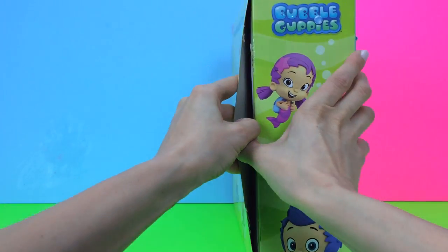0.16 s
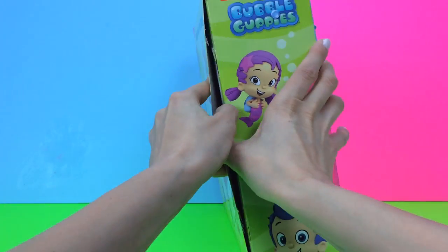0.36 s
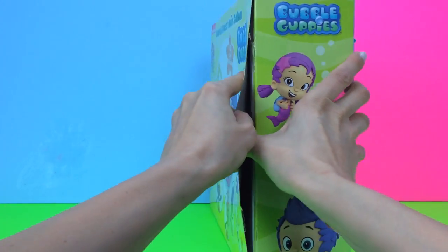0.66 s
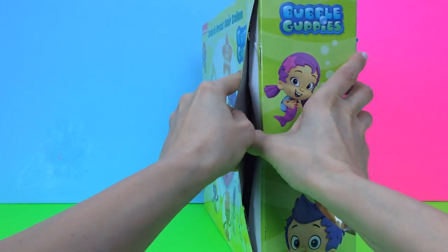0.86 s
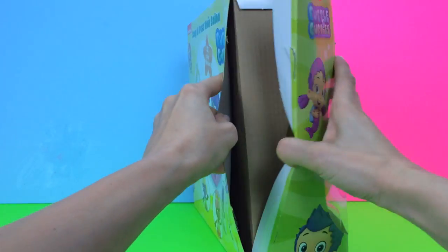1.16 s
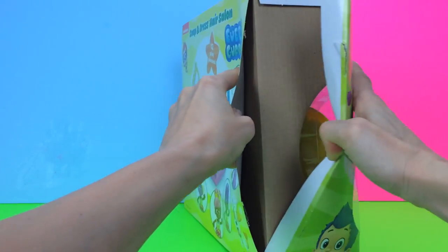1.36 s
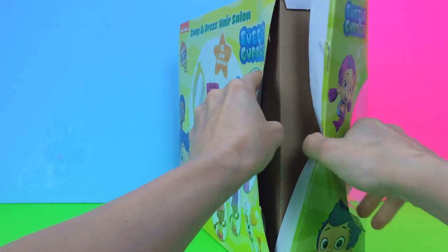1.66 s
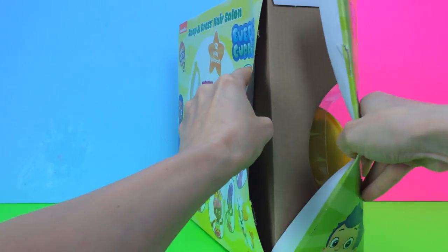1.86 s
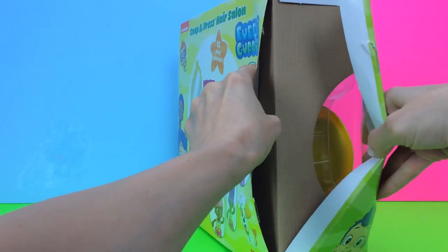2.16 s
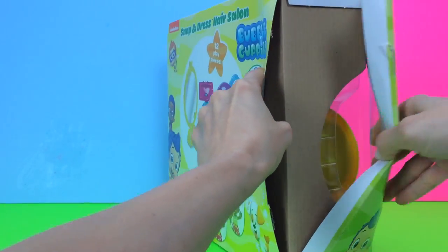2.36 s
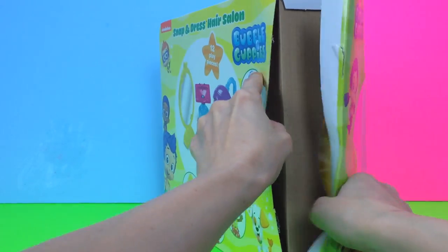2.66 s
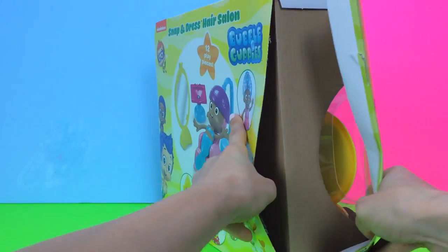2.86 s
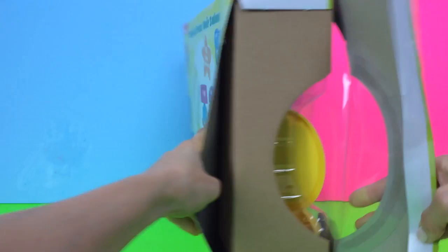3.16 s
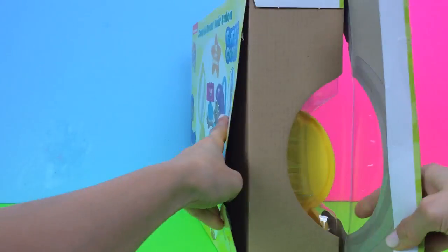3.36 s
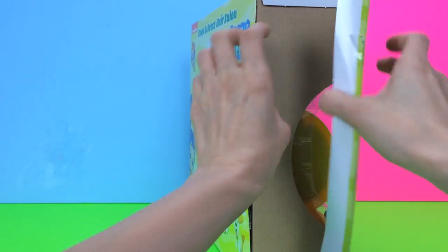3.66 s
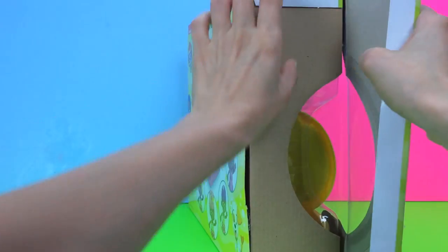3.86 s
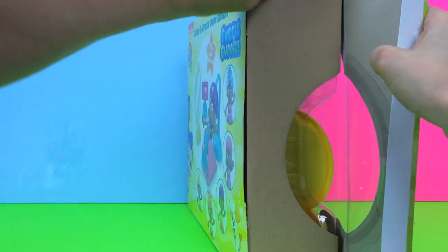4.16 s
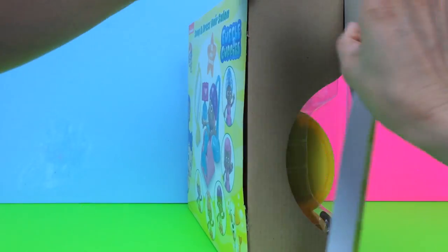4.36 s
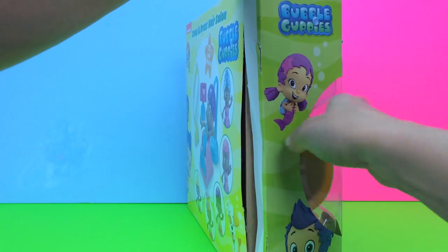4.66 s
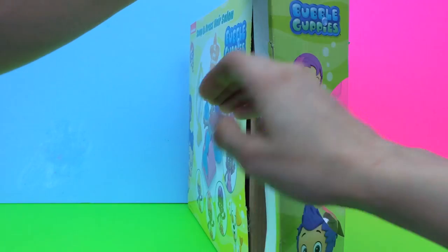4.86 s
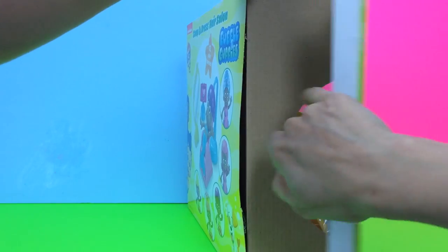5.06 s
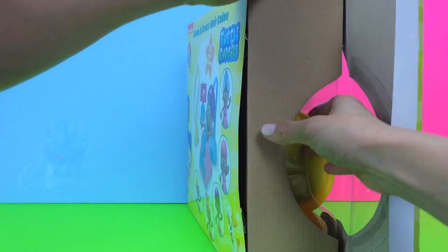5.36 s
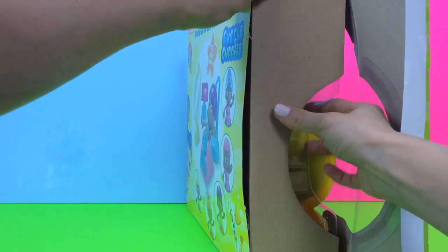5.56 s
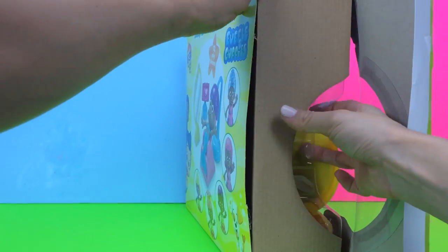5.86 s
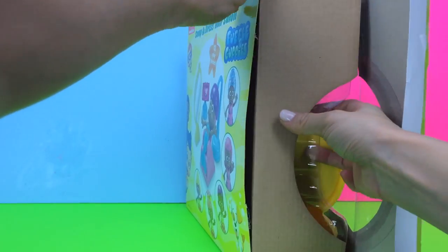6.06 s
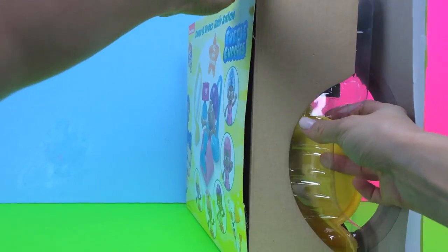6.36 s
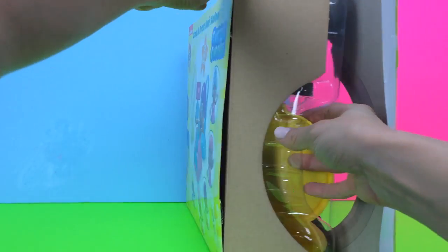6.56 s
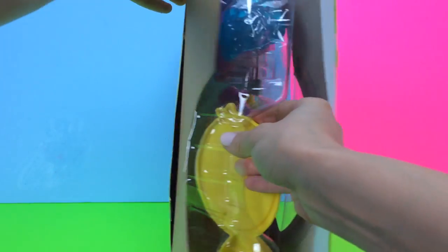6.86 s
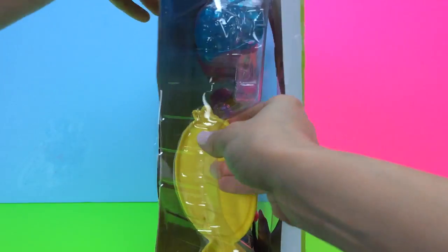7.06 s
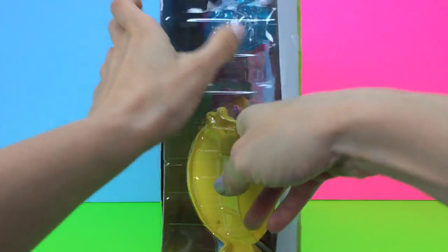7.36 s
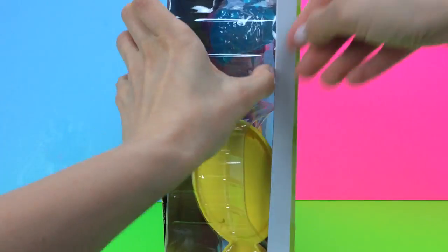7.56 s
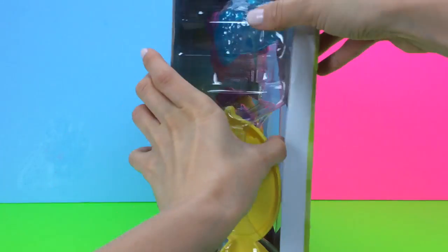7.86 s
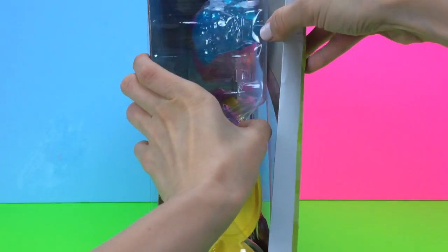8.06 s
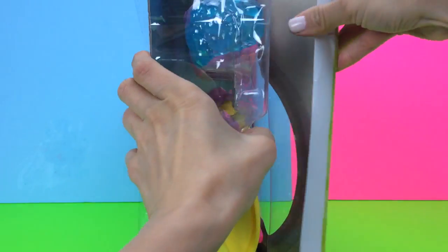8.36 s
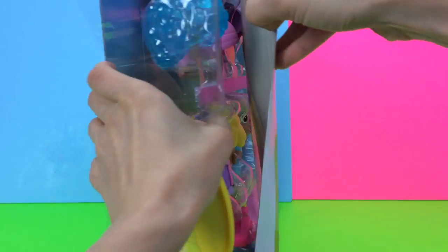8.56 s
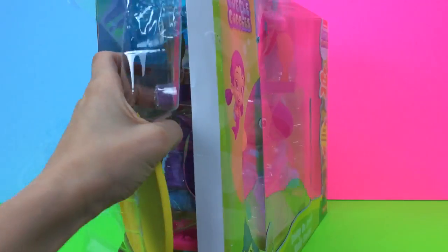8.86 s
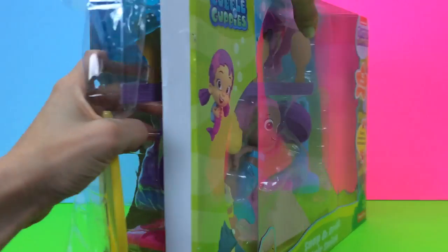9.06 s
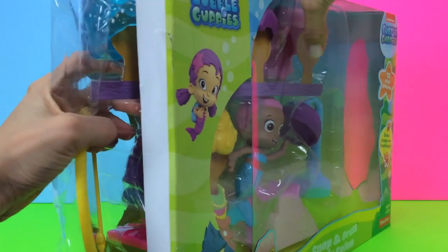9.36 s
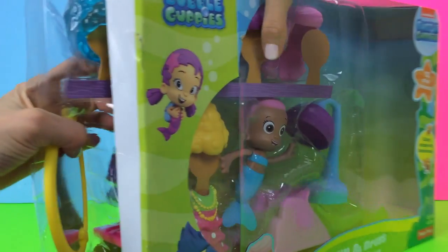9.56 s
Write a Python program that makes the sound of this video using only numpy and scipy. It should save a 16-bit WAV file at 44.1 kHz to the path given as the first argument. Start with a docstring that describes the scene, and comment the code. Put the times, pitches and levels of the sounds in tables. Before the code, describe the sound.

Hands shift and tap a hollow cardboard box, then work a crinkly thin plastic tray out with scrapes, clicks, rustles and a final quick chatter.

```python
"""Hands open a cardboard toy box and work a thin plastic tray out of it, in a small live room; mono.
From the start, over faint room noise, they shift and tap the card: jerky friction and single jerks make it ring.
Creases ping as falling notes, parts drag as rough friction, edges squeak and smooth faces hiss as gliding noise bands.
After six seconds the bared plastic adds resonances; near the end quick knocks chatter. Echoes follow every touch.
Panels boom, the stiff sheet rattles and the surface crackles: most touches sound in all three registers."""
import sys
import numpy as np
from scipy import signal
from scipy.fft import rfft, irfft
from scipy.io import wavfile

SR = 44100
rng = np.random.default_rng(int(sys.argv[2]) if len(sys.argv) > 2 else 0)


def generate_wav(sig):
    """Save sig (samples, or channels by samples) to the path in sys.argv[1] as 16-bit PCM at SR."""
    pcm = np.round(np.clip(np.atleast_2d(sig).T, -1, 1) * 32767).astype(np.int16)
    wavfile.write(sys.argv[1], SR, pcm)


N = 428211
TIME = np.arange(N) / SR
CUTOFF_HZ = 15500   # top of the finished sound
PANEL, SHEET, SURFACE = 0, 1, 2   # the three registers: boom, rattle, crackle


def from_db(db):
    """Turn decibels into a gain."""
    return 10 ** (np.asarray(db) / 20)


def rms_one(x):
    """Scale a sound to an average strength (rms) of 1."""
    return x / np.sqrt(np.mean(x ** 2) + 1e-20)


def at_hz(points, hz, axis=1):
    """Read a table column at any pitch, in straight lines along log frequency."""
    points = np.array(points)
    return np.interp(np.log(np.maximum(hz, 1)), np.log(points[:, 0]), points[:, axis])


def add(out, s, sound):
    """Mix a sound in at time s."""
    at = max(0, round(s * SR))
    out[at:at + len(sound)] += sound[:N - at]


def convolve(x, response):
    """Let every sample of x set off the response."""
    return signal.oaconvolve(x, response)[:len(x)]


def sharp_filter(x, order, hz, kind):
    """Keep the part of x that lies above, below or between the given pitches."""
    return signal.sosfilt(signal.butter(order, hz, kind, fs=SR, output="sos"), x)


def resonance(x, hz, q):
    """Ring at one note; a higher q rings longer and purer."""
    return signal.lfilter(*signal.iirpeak(hz, q, fs=SR), x)


def drift(per_s):
    """Wander by chance: per_s random heights a second (spread 1), joined by straight lines."""
    knots = rng.standard_normal(N // 20)
    return np.interp(TIME * per_s, np.arange(len(knots)), knots)


# Standing waves of box and tray. Columns: f/Hz, width/Hz, lift/dB
BOX_MODES = [(200, 45, 3), (264, 14, 1.5), (352, 13, 4), (524, 7.3, 6.5), (554, 7.3, 6), (616, 18, 4.5),
             (826, 17, 4), (1062, 30, 1.5), (2308, 14, 3.5), (2629, 23, 2)]


def body(colour, size=8192):
    """A knock's response: the given colour with the box's standing waves on top, at energy 1."""
    hz = np.arange(size // 2 + 1) * SR / size
    level_db = at_hz(colour, hz)
    for f, width, lift in BOX_MODES:
        level_db = level_db + lift / (1 + (2 * (hz - f) / width) ** 2)
    # minimum phase: nothing sounds before its cause
    cepstrum = irfft(np.log(from_db(level_db)))
    cepstrum[1:size // 2] *= 2
    cepstrum[size // 2 + 1:] = 0
    return rms_one(irfft(np.exp(rfft(cepstrum)))) / np.sqrt(size)


# Colour of the still room. Columns: f/Hz, relative level per Hz/dB
QUIET_COLOUR = [(25, -18.5), (60, -31), (100, -17.5), (200, 4), (600, -2), (1500, -4.5), (3000, -14.5),
                (12000, -11.5), (16000, -22.5)]


def still_room(level_db):
    """Steady noise in the colour of the still room, with the standing waves on top."""
    return from_db(level_db) * convolve(rng.standard_normal(N), body(QUIET_COLOUR))


# Colours of the three registers. Columns of each: f/Hz, relative level per Hz/dB
PANEL_COLOUR = [(60, -44.5), (100, -31.5), (130, -18), (170, -11.5), (250, -3.5), (350, 1.5), (450, -3.5),
                (620, 2), (800, -1), (1100, -8.5), (1800, -43.5)]
SHEET_COLOUR = [(300, -36), (600, -11), (850, 1.5), (1200, 2.5), (1700, 1.5), (2150, -3.5), (2600, -10.5),
                (3200, -15.5), (5000, -35.5)]
SURFACE_COLOUR = [(1500, -13), (2700, 1), (3400, -1), (4400, 2.5), (5600, -1.5), (7500, -1), (9500, 2),
                  (13000, 0), (15000, -2.5), (16000, -7.5)]


def register_bodies():
    """Panel, sheet and surface each turn the same kind of touch into their own colour."""
    return body(PANEL_COLOUR), body(SHEET_COLOUR), body(SURFACE_COLOUR)


def friction(slips_per_s, spread_db, smooth_share, catch_db, count=8):
    """Stick and slip: jerks of random size and pitch over smooth rubbing, in clumps as the edge catches; rms 1."""
    sizes = from_db(spread_db * np.minimum(rng.exponential(1, N), 4)) * rng.choice([-1, 1], N)
    jerks = sizes * (rng.random(N) < slips_per_s / SR)
    dealt = rng.integers(0, count, N)   # deals each jerk to one pitch
    slips = np.zeros(N)
    for k, hz in enumerate(np.geomspace(110, 14000, count)):
        octave = signal.butter(1, [hz / np.sqrt(2), hz * np.sqrt(2)], "band", fs=SR)
        slips += signal.lfilter(*octave, jerks * (dealt == k) + 1e-18)
    share = np.clip(smooth_share, 0, 1)
    force = np.sqrt(1 - share) * rms_one(slips) + np.sqrt(share) * rng.standard_normal(N)
    return rms_one(force * from_db(catch_db * drift(70)))


TRAY_BARED_S = (6.02, 6.4)   # the tray slides clear of the card between these times
# How hard the hands work, before material and trim. Columns: t/s, level/dB
EFFORT = [(0.0, -51.5), (0.35, -50.5), (0.9, -59.5), (1.83, -56), (1.98, -60), (2.35, -65.5), (2.68, -47),
          (3.78, -61.5), (4.52, -52), (4.78, -64.5), (4.95, -72), (5.29, -49), (5.75, -54.5), (6.02, -62),
          (6.37, -48), (7.48, -44.5), (7.66, -63.5), (8.23, -53), (8.34, -47.5), (9.0, -42), (9.28, -56),
          (9.5, -49), (9.71, -40.5)]
# What the hands draw from each material, against the effort.
# Columns: panel level/dB, sheet level/dB, surface level/dB
CARD_DB = (2.5, -2, -5)
PLASTIC_DB = (-2.5, 1, -9.5)
# Grain of the handling, one row each for panel, sheet, surface.
# Columns: slips per second/(1/s), spread of sizes/dB, smooth share/(0 to 1), catching/dB
HANDLING_GRAIN = [(600, 3.9, 0.23, 1.9), (450, 2.9, 0.45, 1.6), (600, 2.8, 0.7, 2.8)]


def handling(response, register, trim_db):
    """Hands shift and press all the time, first on card, then on the bared plastic."""
    force = friction(*HANDLING_GRAIN[register])
    effort_db = np.interp(TIME, *np.transpose(EFFORT))
    material_db = np.interp(TIME, TRAY_BARED_S, [CARD_DB[register], PLASTIC_DB[register]])
    return convolve(force * from_db(effort_db + material_db + trim_db), response)


# Echoes of the room. Columns: f/Hz, time to fall by 60 dB t/s, tail against direct sound level/dB
ROOM = [(150, 0.41, -4.5), (397, 0.49, -5), (980, 0.61, -10), (2480, 0.52, -5), (7000, 0.45, -6),
        (15000, 0.19, -6.5)]


def room_tail(gap_s, build_s, count=10):
    """A dense tail builds up after the first wall echo and dies band by band."""
    t = np.arange(int(.8 * SR)) / SR
    edges = np.geomspace(70, 17000, count + 1)
    onset = 1 - np.exp(-np.maximum(t - gap_s, 0) / build_s)
    tail = np.zeros(len(t))
    for low, high in zip(edges, edges[1:]):
        hz = np.sqrt(low * high)
        band = sharp_filter(rng.standard_normal(len(t)), 2, [low, high], "band")
        band = rms_one(band * onset * from_db(-60 * t / at_hz(ROOM, hz)))
        tail += band * from_db(at_hz(ROOM, hz, axis=2)) * np.sqrt(2 * (high - low) / SR / len(t))
    return tail


def room(x, gap_s, build_s, count=5):
    """The sounding spot wanders over the box, and each place has its own pattern of echoes."""
    nearness = np.exp([2 * drift(12) for _ in range(count)])
    nearness /= np.sqrt(np.sum(nearness ** 2, axis=0))   # keeps the total power even
    return x + sum(convolve(x * near, room_tail(gap_s, build_s)) for near in nearness)


def registers(body_db, surface_db, note_hz):
    """Big, low parts boom and small, high ones rattle: split the body's energy by its note."""
    # equal at 1020 Hz; the boom leads by 12.5 dB more for each octave below
    lead = from_db(12.5 * np.log2(1020 / note_hz))
    rattle_db = body_db - 10 * np.log10(1 + lead ** 2)
    boom_db = rattle_db + 20 * np.log10(lead)
    return boom_db, rattle_db, surface_db


def overtones(jerk, spot_hz, count=3):
    """No two spots are bent alike, so each colours its click with a few resonances of its own."""
    multiples = np.exp(rng.uniform(*np.log((1.4, 9)), count))   # 1.4 to 9 times the note
    for hz in np.minimum(spot_hz * multiples, CUTOFF_HZ):
        jerk = jerk + resonance(jerk, hz, q=14)
    return jerk


SPOT_Q = 11   # sharpness of a struck spot's note
SPOT_LOWEST_SHARE = 0.17   # a spot radiates down to this share of its note
SOFT_DB_PER_OCTAVE = 8.5   # loss of crackle that goes with a touch one octave duller
# Taps, snaps and buckles; energy given as a level over 10 ms, before trim.
# Columns: t/s, body level/dB, surface level/dB, note of the moving spot f/Hz
CONTACTS = [(0.0188, -36.5, -41.5, 720), (0.201, -34.5, -53.5, 633), (0.2726, -28.5, -38, 716),
            (0.2805, -31, -48, 656), (0.382, -45, -49, 670), (0.4305, -43, -50, 596),
            (0.4612, -43, -67, 563), (0.6262, -30, -62, 676), (0.632, -29.5, -60, 380),
            (1.0409, -25.5, -58.5, 640), (1.0633, -26, -34, 1360), (1.0964, -16, -24, 637),
            (1.1117, -25, -46, 637), (1.174, -36, -59, 636), (1.182, -49, -63, 1550),
            (1.4964, -48, -66, 910), (1.599, -45, -62, 1070), (1.6447, -40, -50, 1590),
            (1.671, -51, -53, 656), (2.0231, -36, -37, 980), (2.0581, -30, -49, 660),
            (2.399, -44.5, -61, 690), (2.4234, -41.5, -53, 750), (2.477, -46, -66, 1243),
            (2.526, -53, -56, 710), (2.5531, -42.5, -60, 1181), (2.6136, -38.5, -56, 534),
            (2.7421, -30, -38, 1390), (2.7914, -38, -49, 1300), (2.9571, -31.5, -66, 487),
            (3.084, -34, -34, 1050), (3.1767, -23, -24, 615), (3.192, -21, -31, 895),
            (3.206, -18.5, -31, 654), (3.799, -47, -59, 530), (4.1903, -38.5, -45.5, 1030),
            (4.293, -30.5, -42, 635), (4.414, -43, -39.5, 1690), (4.4527, -41.5, -35.5, 1660),
            (4.49, -40.5, -56, 650), (4.538, -34, -50, 900), (4.567, -35, -37.5, 1601),
            (4.79, -55, -62, 1100), (4.876, -56.5, -75, 1390), (5.0289, -46.5, -52, 740),
            (5.1793, -38.5, -43, 1110), (5.247, -33, -44, 620), (5.2555, -29.5, -68, 543),
            (5.301, -42, -50, 620), (5.3345, -38, -50, 600), (5.342, -38.5, -56, 780),
            (5.412, -41, -58, 610), (5.4218, -39.5, -46.5, 1480), (5.4593, -37, -53, 560),
            (5.5642, -33.5, -46, 540), (5.595, -43, -47.5, 1390), (5.6519, -34, -44, 640),
            (5.802, -42, -56, 1190), (5.85, -48.5, -48.5, 1260), (5.889, -50, -57, 1040),
            (5.9192, -33.5, -53.5, 1630), (6.1008, -31.5, -40, 1340), (6.1645, -34, -36, 1400),
            (6.19, -32, -30, 1000), (6.1836, -27, -31, 675), (6.201, -23.5, -27.5, 1500),
            (6.234, -23.5, -44, 1510), (6.314, -28.5, -38.5, 1620), (6.5038, -33.5, -49, 1390),
            (6.707, -34.5, -50, 1800), (6.75, -30, -50, 1500), (6.781, -29.5, -50, 1570),
            (6.7982, -39, -34, 1500), (6.818, -30, -47, 1610), (6.8508, -26, -35, 1440),
            (6.8615, -27.5, -32.5, 1490), (6.8903, -32, -32.5, 1400), (6.945, -35.5, -38, 1630),
            (7.1642, -36.5, -61, 1510), (7.183, -39, -37.5, 1200), (7.225, -29, -29, 1530),
            (7.2365, -27, -27.5, 1303), (7.2444, -18, -31.5, 1530), (7.2587, -21, -32, 1060),
            (7.52, -37, -49, 1135), (7.9556, -32, -72, 1460), (8.2302, -37, -58, 1560),
            (8.246, -33.5, -50, 1400), (8.2533, -26, -38, 1530), (8.2858, -28, -39.5, 640),
            (8.3123, -19, -29.5, 1513), (8.4412, -54, -42, 1500), (8.4638, -36, -38.5, 1600),
            (8.5, -36.5, -53, 1510), (8.5231, -35, -37, 1190), (8.5542, -35, -42, 1300),
            (8.577, -35.5, -45, 1400), (8.6244, -30, -39, 1160), (8.681, -32, -60, 883),
            (8.72, -38, -53, 1105), (8.756, -27.5, -42, 610), (8.872, -24, -33.5, 1360),
            (8.9208, -28.5, -37, 1040), (8.9625, -27.5, -33.5, 1344), (9.072, -36, -45, 1250),
            (9.192, -42, -51, 630), (9.318, -36, -46, 1220), (9.341, -48, -55, 1700),
            (9.434, -46, -58, 1800), (9.556, -39, -43, 1190), (9.5789, -37.5, -39.5, 1790),
            (9.6102, -41, -48, 1800), (9.6463, -37.5, -36.5, 1620), (9.665, -36, -46, 1700),
            (9.678, -34, -39.5, 1380)]


def contacts(response, register, trim_db, give_s, ring_t60, ring_db, spot_db, firm_hz,
             size=4096, lead_size=400):
    """The material starts to give, jerks, then shudders briefly, ringing most at the note of that spot."""
    out = np.zeros(N)
    t = (np.arange(size) - lead_size) / SR   # 0 at the jerk itself
    giving = .5 * np.exp(np.minimum(t, 0) / give_s)
    ringing = from_db(-60 * np.maximum(t, 0) / ring_t60)
    shudder = np.where(t < 0, giving, ringing)
    for s, body_db, surface_db, spot_hz in CONTACTS:
        levels_db = registers(body_db, surface_db, spot_hz)
        # bending waves arrive spread in time, yet all pitches are about equally strong
        spread = rfft(rng.standard_normal(size) * np.sqrt(shudder))
        waves = irfft(np.exp(1j * np.angle(spread)))
        jerk = from_db(ring_db) * rms_one(waves * np.sqrt(shudder)) / np.sqrt(size)
        jerk[lead_size] += 1
        jerk = jerk + from_db(spot_db) * resonance(jerk, spot_hz, SPOT_Q)
        jerk = overtones(jerk, spot_hz)
        jerk = signal.lfilter(*signal.butter(2, SPOT_LOWEST_SHARE * spot_hz, "high", fs=SR), jerk)
        # a soft touch makes little crackle and is duller throughout
        softness_octaves = (surface_db - levels_db[SHEET]) / SOFT_DB_PER_OCTAVE
        top_hz = np.clip(firm_hz * 2 ** softness_octaves, 900, 19000)
        jerk = signal.lfilter(*signal.butter(2, top_hz, fs=SR), jerk)
        sound = signal.fftconvolve(jerk, response)
        sound *= np.sqrt(.01 * SR / np.sum(sound ** 2))   # energy of rms 1 lasting 10 ms
        add(out, s - lead_size / SR, from_db(levels_db[register] + trim_db) * sound)
    return out


CREASE_OCTAVE_S = 0.0057   # a ping of this length falls through one octave; longer ones are purer
# Creases flipping over; energy given as a level over 10 ms, before trim.
# Columns: t/s, note f/Hz, level/dB, length t/s
CREASES = [(0.02, 710, -39, 0.0077), (0.626, 715, -35, 0.011), (0.629, 386, -37, 0.013),
           (1.0962, 1766, -21, 0.0048), (1.0965, 640, -24, 0.014), (1.099, 477, -24.5, 0.022),
           (1.109, 625, -25, 0.0095), (2.023, 720, -35, 0.007), (2.741, 1450, -33.5, 0.0043),
           (3.085, 640, -37, 0.01), (4.291, 3600, -46, 0.005), (4.568, 1650, -33.5, 0.0063),
           (5.031, 5350, -64, 0.009), (5.4225, 3700, -53, 0.0048), (5.921, 1540, -43, 0.0057),
           (6.1006, 5500, -39, 0.0039), (6.101, 670, -33, 0.012), (6.311, 1580, -27, 0.0057),
           (6.503, 1510, -33.5, 0.0058), (6.7975, 4450, -34.5, 0.0046), (6.853, 885, -25, 0.0085),
           (6.863, 873, -25.5, 0.0081), (7.236, 1820, -24.5, 0.0062), (7.2366, 420, -27, 0.0088),
           (8.3118, 1680, -27, 0.009), (8.3125, 2490, -30.5, 0.0077), (8.313, 610, -35, 0.0045),
           (8.625, 3230, -54, 0.0067), (8.8712, 7300, -33, 0.0037), (8.8714, 960, -46, 0.0094),
           (9.316, 2760, -47.5, 0.0061), (9.56, 5370, -48, 0.006), (9.667, 4630, -55, 0.0042),
           (9.677, 5650, -42, 0.0038)]


def creases(trim_db):
    """Each flip sends out one short packet of bending waves, whose higher pitches arrive first."""
    out = np.zeros(N)
    for s, note_hz, level_db, length_s in CREASES:
        progress = np.linspace(0, 1, int(length_s * SR))
        # starts above the note and ends below it
        hz = note_hz * 2 ** (CREASE_OCTAVE_S / length_s * (.28 - progress))
        swell = np.sin(np.pi * np.sqrt(progress)) ** 2
        ping = swell * np.sin(2 * np.pi * np.cumsum(hz) / SR)
        ping *= np.sqrt(.01 * SR / np.sum(ping ** 2))
        add(out, s, from_db(level_db + trim_db) * ping)
    return out


LOWEST_SHARE = 0.16   # a dragged part radiates down to this share of its note
# Grain of the drags, one row each for panel, sheet, surface.
# Columns: slips per second/(1/s), spread of sizes/dB, smooth share/(0 to 1), catching/dB
DRAG_GRAIN = [(2400, 2.4, 0.25, 0.9), (1500, 2.5, 0.15, 1.3), (2200, 2.8, 0.35, 1.2)]
# Settling after a drag, one row each for panel, sheet, surface.
# Columns: level against the crest/dB, time to fall by 60 dB t/s
SETTLING = [(-13, 0.45), (-9.5, 0.49), (-17, 0.66)]
# Firm drags of flap and tray, levels before trim. The three times are put in order when played.
# Columns: start t/s, crest t/s, end t/s, body level/dB, surface level/dB, note of the moving part f/Hz
DRAGS = [(0.197, 0.195, 0.35, -39, -54, 610), (1.018, 1.07, 1.078, -34, -41.5, 1280),
         (1.116, 1.2, 1.34, -51, -60, 1990), (1.751, 1.79, 1.88, -54, -57, 1200),
         (2.021, 2.045, 2.106, -33, -43.5, 1170), (2.782, 2.776, 2.84, -33.5, -44, 1110),
         (2.943, 2.94, 3.01, -42, -54, 480), (3.159, 3.187, 3.215, -18.5, -25, 934),
         (3.207, 3.232, 3.262, -21, -34, 870), (3.6, 3.62, 3.64, -52.5, -86, 840),
         (3.95, 3.99, 4.03, -48.5, -61, 1320), (4.12, 4.13, 4.2, -47, -61, 910),
         (5.028, 5.08, 5.19, -56.5, -55, 1120), (5.252, 5.24, 5.26, -49.5, -55.5, 643),
         (6.028, 6.06, 6.13, -40, -46.5, 1300), (6.148, 6.246, 6.296, -27.5, -37.5, 1470),
         (6.712, 6.846, 6.963, -32.5, -40.5, 1740), (6.968, 7.03, 7.03, -46.5, -47, 1479),
         (7.232, 7.255, 7.24, -25, -42, 1600), (7.728, 7.9, 7.84, -57, -71, 1470),
         (7.874, 7.95, 7.99, -44, -69, 1380), (8.732, 8.71, 8.87, -33.5, -43.5, 1210),
         (9.027, 9.04, 9.15, -41, -44.5, 1450), (9.33, 9.3, 9.48, -54.5, -62, 520)]


def drags(response, register, trim_db, ease_db, stop_s):
    """A drag builds to a crest, eases and stops, and the box settles; a small flap cannot radiate the lows."""
    out, force = np.zeros(N), friction(*DRAG_GRAIN[register])
    settle_db, settle_t60 = SETTLING[register]
    for *times, body_db, surface_db, note_hz in DRAGS:
        start, crest, end = np.sort(times)
        span = slice(int(start * SR), int((end + settle_t60) * SR))
        t = TIME[span]
        pressure = np.interp(t, [start, crest, end, end + stop_s], [0, 1, from_db(ease_db), 0])
        settling = (t > end) * from_db(settle_db - 60 * np.maximum(t - end, 0) / settle_t60)
        slips = force[span] / np.std(force[span][t < end + stop_s])
        rub = sharp_filter(slips * np.maximum(pressure, settling), 2, LOWEST_SHARE * note_hz, "high")
        level_db = registers(body_db, surface_db, note_hz)[register] + trim_db
        add(out, start, from_db(level_db) * rub)
    return convolve(out, response)


def stroke(force, start, end):
    """Cut one stroke out of a force, at least 200 samples long."""
    first = int(start * SR)
    return force[first:max(int(end * SR), first + 200)]


def glide(force, first_hz, last_hz, width_hz):
    """Keep one band whose centre glides; the result is complex, its size is the momentary level."""
    turn = np.exp(2j * np.pi * np.cumsum(np.linspace(first_hz, last_hz, len(force))) / SR)
    return turn * sharp_filter(force / turn, 2, width_hz / 2, "low")


SQUEAK_FADE_SHARE = 0.43   # share of a squeak spent fading in and out
SQUEAK_STEADINESS = 0.3   # 0 flutters like noise, 1 holds an even level
# Edges sliding under steady pressure.
# Columns: start t/s, end t/s, first f/Hz, last f/Hz, width/Hz, level/dB
SQUEAKS = [(0.828, 0.916, 2430, 2230, 280, -66), (0.935, 1.04, 2170, 1930, 400, -62),
           (1.04, 1.075, 584, 615, 60, -34), (2.745, 2.8, 890, 800, 110, -39),
           (2.805, 2.916, 1690, 1530, 300, -46), (2.795, 2.94, 3210, 2630, 450, -57),
           (2.963, 3.063, 425, 517, 150, -47.5), (5.034, 5.22, 1700, 1320, 420, -50.5),
           (5.043, 5.152, 8300, 10000, 600, -56), (7.91, 7.95, 1610, 1680, 100, -48.5),
           (8.07, 8.166, 690, 810, 80, -58), (8.143, 8.233, 830, 960, 120, -53.5),
           (8.143, 8.23, 1380, 1640, 300, -54.5)]


def squeaks():
    """Friction keeps one husky resonance going, gliding as the free length of the edge changes."""
    out, force = np.zeros(N), rng.standard_normal(N)
    for start, end, first_hz, last_hz, width_hz, level_db in SQUEAKS:
        note = glide(stroke(force, start, end), first_hz, last_hz, width_hz)
        note = note.real / (np.abs(note) + 1e-18) ** SQUEAK_STEADINESS
        fade = signal.windows.tukey(len(note), SQUEAK_FADE_SHARE)
        add(out, start, from_db(level_db) * rms_one(note * fade))
    return out


# Grain of the light slides.
# Columns: slips per second/(1/s), spread of sizes/dB, smooth share/(0 to 1), catching/dB
SWISH_GRAIN = (2500, 3.0, 0.35, 1.7)
# Light slides on smooth faces. Columns: start t/s, end t/s, first f/Hz, last f/Hz, width/Hz,
# level/dB, share of the stroke spent fading in and out/(0 to 1)
SWISHES = [(0.976, 1.075, 10400, 11000, 3000, -55, 0.64), (1.57, 1.747, 12000, 9900, 4500, -61.5, 0.5),
           (1.767, 1.86, 11000, 11400, 6000, -63, 0.5), (2.518, 2.684, 12860, 12990, 4550, -59, 0.27),
           (2.695, 2.746, 2190, 2000, 800.3, -42, 0.35), (2.79, 2.888, 2700, 2300, 2200, -47, 0.5),
           (2.942, 3.059, 12900, 11400, 4600, -48, 0.5), (3.527, 3.714, 11930, 11200, 6000, -63, 0.5),
           (3.802, 3.852, 11600, 11300, 4520, -56, 0.4), (3.93, 4.056, 11600, 12000, 3500, -49.5, 0.13),
           (4.022, 4.054, 11600, 11500, 4500, -50, 0.4), (4.117, 4.187, 11000, 11000, 4000, -55.5, 0.7),
           (4.298, 4.47, 10000, 11500, 7000, -53, 0.46), (4.347, 4.385, 9500, 10620, 5030, -44, 0.45),
           (4.411, 4.468, 1740, 1620, 600, -45.5, 0.4), (5.044, 5.214, 11600, 11400, 4360, -51, 0.5),
           (5.272, 5.365, 12300, 12000, 5000, -52, 0.5), (5.435, 5.495, 12500, 12500, 5000, -55, 0.5),
           (6.028, 6.14, 6700, 6300, 2800, -49, 0.26), (6.139, 6.213, 11500, 11200, 6030, -36.5, 0.62),
           (6.561, 6.682, 8300, 8648, 1900, -45.5, 0.91), (6.42, 6.75, 10500, 10500, 8000, -59.5, 0.4),
           (6.751, 6.903, 12500, 12500, 5000, -44, 0.25), (7.206, 7.229, 4370, 4970, 1200, -37.5, 0.5),
           (7.219, 7.232, 4900, 6670, 1410, -28, 0.54), (7.722, 7.86, 11900, 11000, 5030, -64, 0.2),
           (7.885, 8.065, 10500, 9500, 8000, -59, 0.22), (8.488, 8.54, 11500, 11000, 5000, -46, 0.41),
           (8.7, 8.733, 11500, 11200, 6000, -44, 0.5)]


def swishes():
    """Light sliding hisses in one band, whose centre glides with the speed of the stroke."""
    out, force = np.zeros(N), friction(*SWISH_GRAIN)
    for start, end, first_hz, last_hz, width_hz, level_db, fade_share in SWISHES:
        hiss = glide(stroke(force, start, end), first_hz, last_hz, width_hz).real
        fade = signal.windows.tukey(len(hiss), fade_share)
        add(out, start, from_db(level_db) * rms_one(hiss * fade))
    return out


# Resonances that the bared plastic tray adds. Columns: f/Hz, width/Hz, level/dB
TRAY_MODES = [(2520, 180, -9), (6200, 2300, -6.5)]


def tray(x):
    """Once out of the card, the thin plastic brightens whatever touches it."""
    rings = sum(from_db(db) * resonance(x, hz, hz / width) for hz, width, db in TRAY_MODES)
    return x + rings * np.interp(TIME, TRAY_BARED_S, [0, 1])


def judder(start_s, end_s, slips_per_s, hz, width_hz, level_db, count=40):
    """The box is swung round on the table and its edge chatters along in quick, nearly regular hops."""
    chance, slips = rng.uniform(-1, 1, (count, 2)), np.zeros(N)
    gaps_s = (1 + 0.2 * chance[:, 0]) / slips_per_s   # each up to a fifth short or long
    sizes = 1 + .5 * chance[:, 1]
    for s, size in zip(start_s + np.cumsum(gaps_s), sizes):
        if s < end_s:
            add(slips, s, [size])
    knocks = sharp_filter(slips + 1e-18, 2, [hz - width_hz / 2, hz + width_hz / 2], "band")
    # the level holds for the chattering stretch alone
    return from_db(level_db) * rms_one(knocks) * np.sqrt((end_s - start_s) * SR / N)


def scene():
    """Handling, drags and contacts excite each register; the room answers."""
    panel, sheet, surface = register_bodies()
    still = still_room(level_db=-70.5)
    boom = (handling(panel, PANEL, trim_db=-1.0)
            + contacts(panel, PANEL, trim_db=-0.5, give_s=0.00097, ring_t60=0.086,
                       ring_db=5.0, spot_db=0.5, firm_hz=8000)
            + drags(panel, PANEL, trim_db=1.5, ease_db=-4.5, stop_s=0.0069))
    rattle = (handling(sheet, SHEET, trim_db=-3.5)
              + contacts(sheet, SHEET, trim_db=-0.5, give_s=0.0038, ring_t60=0.051,
                         ring_db=4.0, spot_db=-2.0, firm_hz=7860)
              + drags(sheet, SHEET, trim_db=0.5, ease_db=-8.0, stop_s=0.0049))
    crackle = (handling(surface, SURFACE, trim_db=-2.0)
               + contacts(surface, SURFACE, trim_db=-3.5, give_s=0.0008, ring_t60=0.035,
                          ring_db=7, spot_db=-1.0, firm_hz=30000)
               + drags(surface, SURFACE, trim_db=3.0, ease_db=-12, stop_s=0.013))
    pings = creases(trim_db=-0.5)
    slides = sharp_filter(squeaks() + swishes(), 4, 250, "high")
    hops = judder(start_s=9.205, end_s=9.6, slips_per_s=71, hz=1010, width_hz=240, level_db=-50.0)
    box = tray(boom + rattle + crackle) + pings + slides + hops
    mono = room(box, gap_s=0.0076, build_s=0.00078) + still
    return np.array([mono, mono])


def record(dry):
    """Cut the top steeply."""
    return signal.sosfilt(signal.ellip(10, .2, 80, CUTOFF_HZ, fs=SR, output="sos"), dry)


dry = scene()
out = record(dry)
generate_wav(out)
```